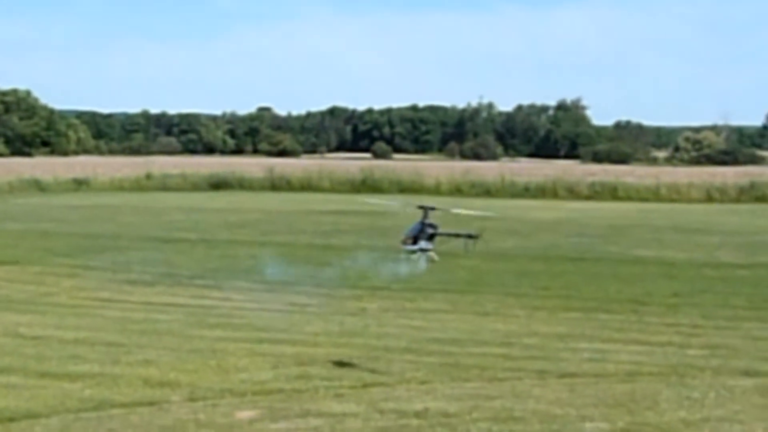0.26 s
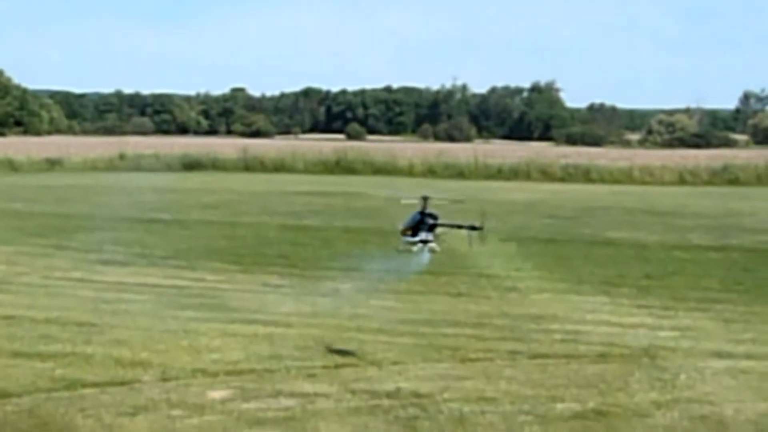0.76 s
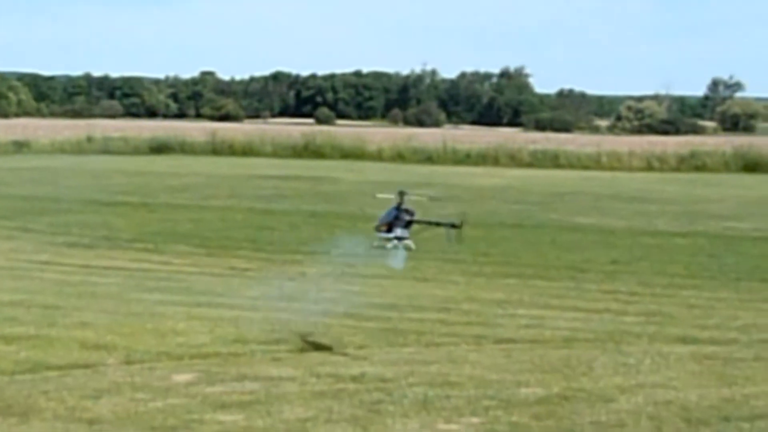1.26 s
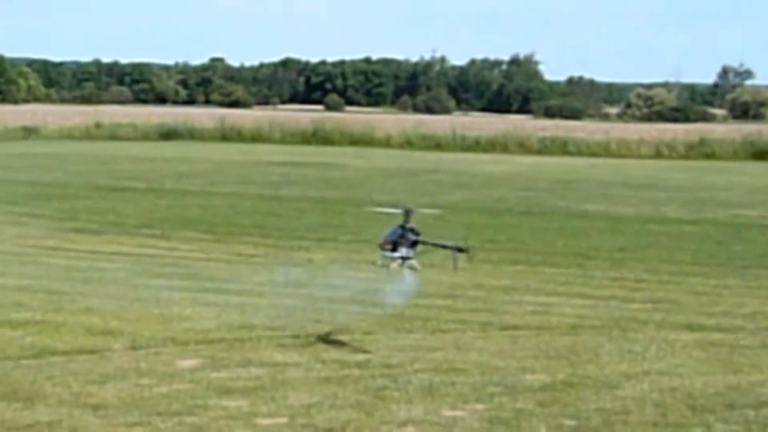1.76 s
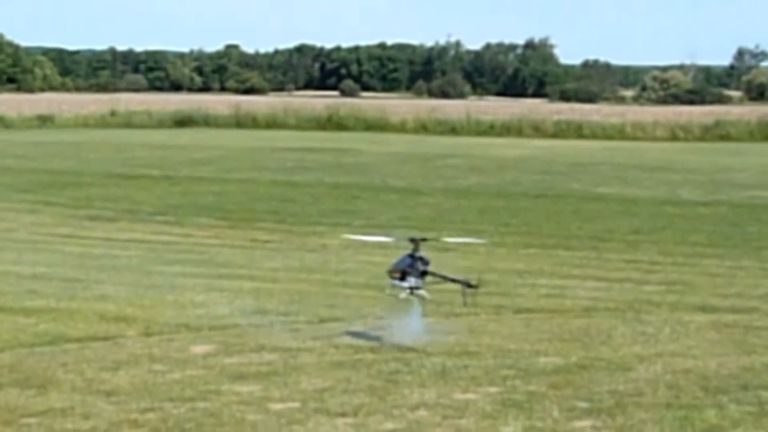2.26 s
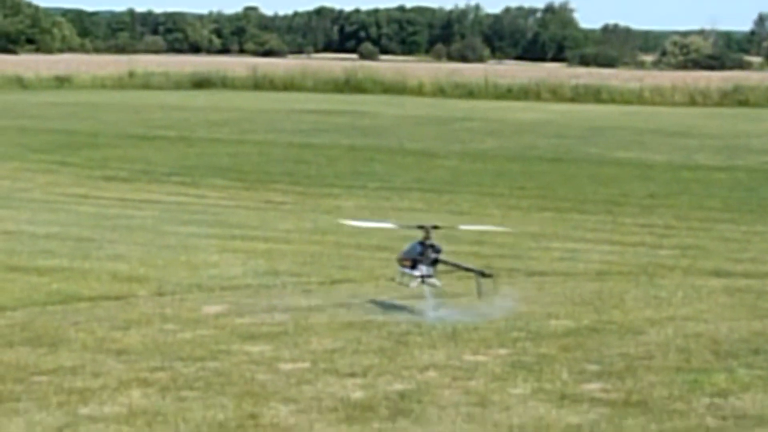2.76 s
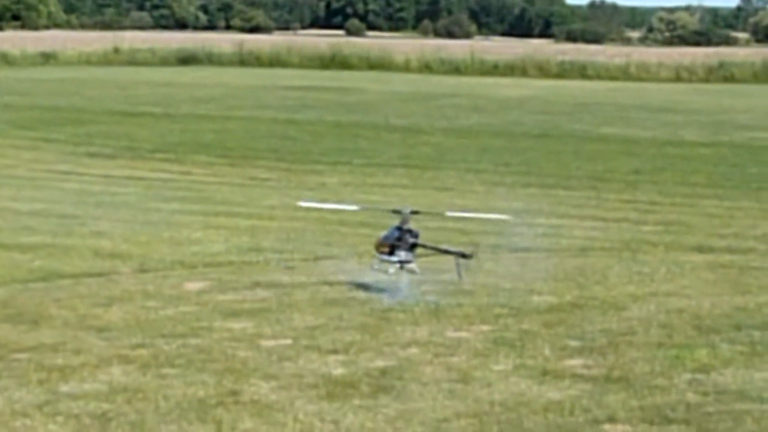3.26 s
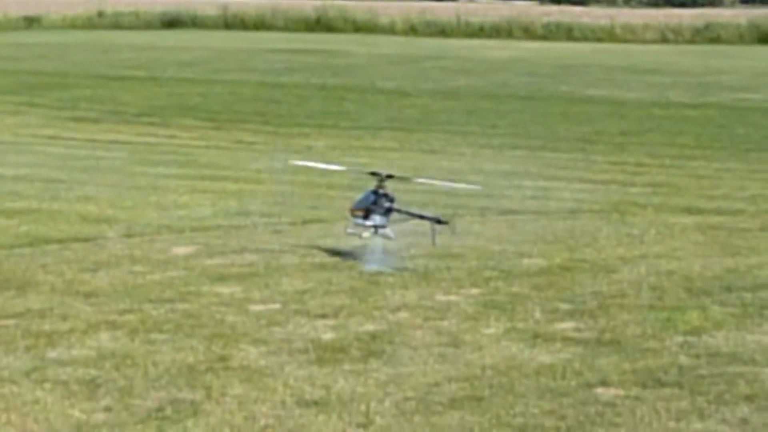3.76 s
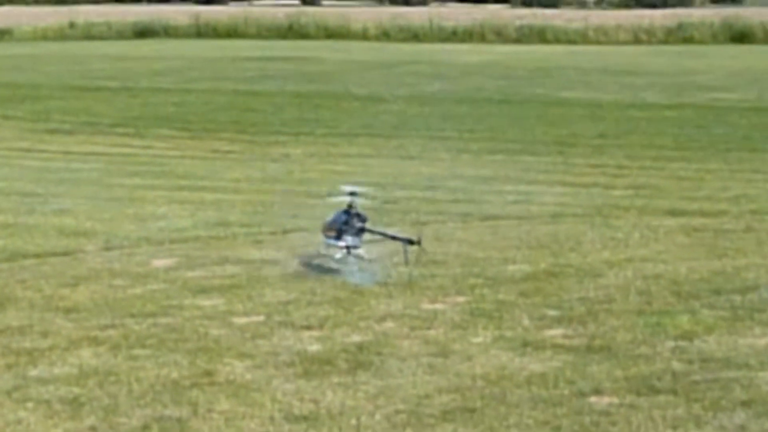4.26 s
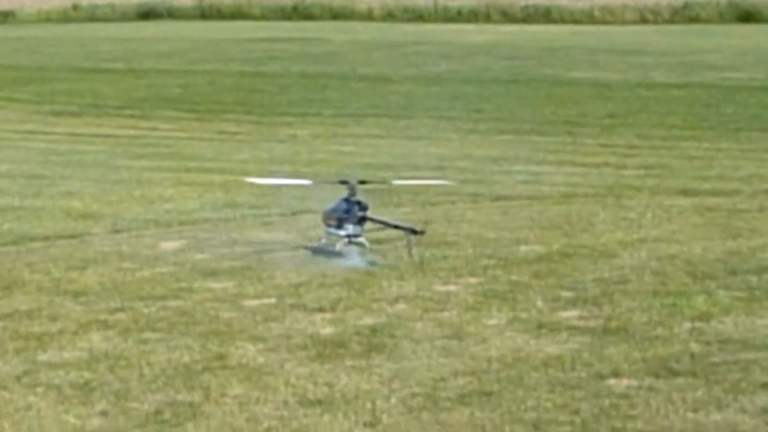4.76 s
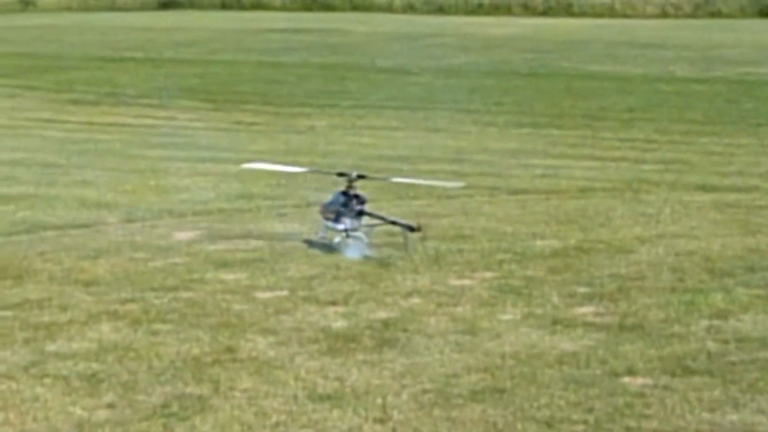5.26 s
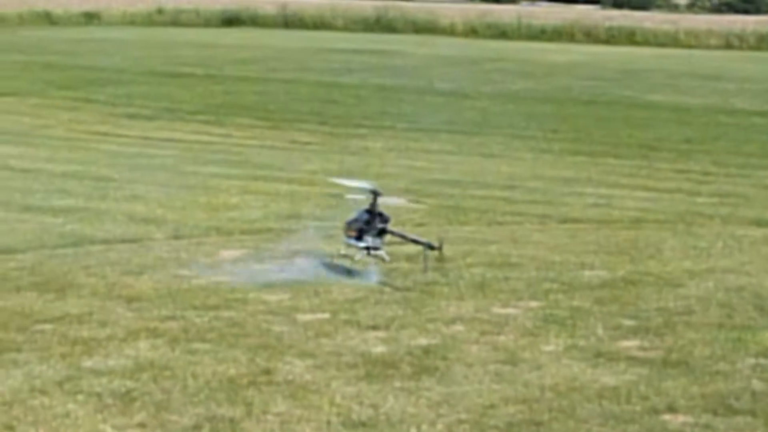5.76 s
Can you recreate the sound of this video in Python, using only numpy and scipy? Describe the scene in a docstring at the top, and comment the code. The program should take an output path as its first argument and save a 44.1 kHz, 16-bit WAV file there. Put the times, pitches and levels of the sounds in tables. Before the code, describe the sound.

Open field, stereo microphone in the wind, no echo. From 0 s a model helicopter hovers: a two-stroke engine whines as a buzzy stack of partials on roughly 235 Hz, edging up to 240 Hz by about 1.5 s and then holding. Uneven firings rasp and burble, blades hiss brightly, and a high gear tone near 4.8 kHz warbles about 28 times a second. Low, lumpy wind buffets from the start, with brief gaps and sharp soft-edged thumps on either side, clustered around 1.5-2.9 s. Between about 1.8 and 3.4 s the machine sinks; near 2.3 s its note turns nasal and honking. Afterwards the whine is fuller, the warble calmer, the gear tone coming and going. Gusts thin after 3 s, leave a clear gap around 4.6-5 s, return near 5.2-5.6 s and fade. The engine swells around 5.1 and 5.9 s, still running at 6 s. The very top is dull.

```python
"""An open field, with the microphone close by: a model helicopter hovers, sinks towards the grass, hovers again.
Its two-stroke engine whines as a stack of partials; strong and weak firings rasp and burble through the frame.
The gears sing a tone that warbles once per rotor turn, and the blades hiss as noise.
Gusts of lumpy noise buffet the two microphone ports and drop away, single eddies thump one port or the other,
and a faint, far rumble of air lies behind."""
import sys
import numpy as np
from scipy import signal
from scipy.fft import rfft, irfft, next_fast_len
from scipy.io import wavfile
from scipy.ndimage import map_coordinates

SR = 44100
rng = np.random.default_rng(int(sys.argv[2]) if len(sys.argv) > 2 else 0)


def wav_record(signal):
    """Record a signal, one row per channel, as 16-bit PCM in the file named by sys.argv[1]."""
    frames = np.transpose(np.atleast_2d(signal))
    bounded = np.clip(frames, -1, 1)
    # unit amplitude maps onto the largest positive 16-bit level
    quanta = np.round(bounded * 32767).astype(np.int16)
    wavfile.write(sys.argv[1], SR, quanta)


N = 264851  # samples


def amp(db):
    """Decibels to gain."""
    return 10 ** (np.asarray(db) / 20)


def unit(x):
    """Scaled to rms 1."""
    return x / np.sqrt(np.mean(x ** 2) + 1e-20)


def along(points, hz):
    """Values at hz, read between (Hz, value) points on a log frequency axis."""
    point_hz, values = np.transpose(points)
    return np.interp(np.log(hz + 1), np.log(point_hz + 1), values)


def curves(rows):
    """One value per sample for each column after the time."""
    seconds, *columns = np.transpose(rows)
    return [np.interp(np.arange(N) / SR, seconds, column) for column in columns]


def wobble(rate):
    """A smooth random curve through rate random knots a second."""
    coarse = np.arange(0, N, 16)  # every 16th sample is smooth enough
    knots = rng.standard_normal(int(N * rate / SR) + 4)
    return np.interp(np.arange(N), coarse, map_coordinates(knots, [coarse * rate / SR]))


def filtered(x, response):
    """x with its spectrum multiplied by response(Hz), without phase shift."""
    size = next_fast_len(N + SR // 2)
    return irfft(rfft(x, size) * response(np.fft.rfftfreq(size, 1 / SR)), size)[..., :N]


def ringing(x, level):
    """Both channels of x through a causal, minimum-phase filter whose gain in dB is level(Hz)."""
    size = 8192
    cepstrum = irfft(np.log(amp(level(np.fft.rfftfreq(size, 1 / SR)))))
    # folding the cepstrum forward puts all of the ringing after the blow
    cepstrum[1:size // 2] *= 2
    cepstrum[size // 2 + 1:] = 0
    impulse = irfft(np.exp(rfft(cepstrum)))
    return signal.fftconvolve(x, impulse[None], axes=1)[:, :N]


def stereo(mid, side):
    """Left and right from mid and side."""
    return np.array([mid + side, mid - side])


# Engine speed, which climbs and then holds nearly steady. Each row: time in seconds, firings a second.
ENGINE_SPEED = [(0, 234.8), (1.3, 239.3), (2.15, 239.8), (2.7, 239.2), (3.1, 240.4), (3.4, 240),
                (4.1, 240.8), (4.7, 240.9), (5.15, 240), (6, 240.8)]
# Loudness of the machine as it works, turns and drifts closer. Each row: time in seconds, level in dB.
LOUDNESS_CURVE = [(0.0, -42), (0.06, -43.5), (0.18, -38), (0.38, -42), (1.04, -40), (1.1, -41.5),
                  (1.5, -41), (2.01, -38.5), (2.46, -41.5), (3.23, -37.5), (3.5, -35), (3.63, -39.5),
                  (3.88, -34), (4.2, -37), (4.48, -34), (4.67, -35.5), (4.77, -32.5), (5.18, -29.5),
                  (5.25, -35.5), (5.6, -36), (5.9, -30.5), (6.01, -31.5)]
# Gear whine against the machine's loudness. Each row: time in seconds, level in dB.
GEAR_LEVEL = [(0, -1.5), (1.0, -3), (1.2, -4.5), (1.55, -6.5), (1.8, -1.5), (2.6, -3.5), (3.1, -13),
              (3.9, -9), (4.6, -16), (4.95, -4.5), (5.3, -17), (5.5, -3.5), (6, -23)]
GEAR_FLICKER_DB = 1.96
# each part's gain at the usual loudness (dB), and the dB it gains for each dB of loudness
USUAL_DB = -38
WHINE_DB, WHINE_GROWS = -49.5, 0.72
RASP_DB, RASP_GROWS = -40, 0.99  # ahead of the airframe
BURBLE_DB, BURBLE_GROWS = -56, 0.84  # ahead of the airframe
SHAKE_ALOFT, SHAKE_LOW = 1, .2  # rotor shake (0-1) at nearness 0 and 1
# the nasal honk early in the descent: its middle (s), its length (s), its height (dB)
HONK_S, HONK_LENGTH_S, HONK_DB = 2.3, 1, 7


def helicopter():
    """Engine, gears and blades, all tied to one crankshaft that turns once per firing."""
    speed, = curves(ENGINE_SPEED)
    loudness_db, = curves(LOUDNESS_CURVE)
    swell_db = loudness_db - USUAL_DB
    sink = descent()
    shake = np.clip(SHAKE_ALOFT + (SHAKE_LOW - SHAKE_ALOFT) * sink, 0, 1)
    honk_db = HONK_DB * 2 ** -(2 * (np.arange(N) / SR - HONK_S) / HONK_LENGTH_S) ** 2
    whine_db = WHINE_DB + WHINE_GROWS * swell_db
    rasp_db = RASP_DB + RASP_GROWS * swell_db
    burble_db = BURBLE_DB + BURBLE_GROWS * swell_db
    gear_db = loudness_db + curves(GEAR_LEVEL)[0] + GEAR_FLICKER_DB * wobble(8.1)

    gear_ratio, hunting, ripple = 8.57, .001, .0045  # crank per rotor turn, share of speed, crank turns
    turns = np.cumsum(speed * (1 + hunting * wobble(25))) / SR
    rotor = 2 * np.pi * turns / gear_ratio
    # the load of the blades speeds and slows the crank once per rotor turn
    turns = turns + ripple * (1 + np.sin(rotor))
    firings = np.diff(np.floor(turns), prepend=0)
    strength = firing_strength(turns, memory=.87)

    # the whine gives way a little while the honk stands out
    whine = amp(whine_db - 0.21 * honk_db) * exhaust(turns, sink, waver_db=0.43, blur=0.11)
    rush = brighten(rasp(turns, firings, strength, uneven_db=3.0))
    drive = amp(burble_db) * burble(firings, strength) + amp(rasp_db) * rush
    engine = honk(whine + airframe(drive, sink), honk_db, centre_hz=1630, width_hz=670)
    teeth = gears(turns, rotor, shake, sink, throb_db=4.2, blur=.55, upper_db=-1)
    return engine + amp(gear_db) * teeth * amp([[-.4], [.4]])  # the gears sit slightly right


# middle (s) and length (s) of the descent, nearness to the ground before and after (0-1)
DESCENT_S, DESCENT_LENGTH_S, NEAR_BEFORE, NEAR_AFTER = 2.57, 1.6, 0.23, 0.85


def descent():
    """Nearness to the ground: the machine hovers, sinks smoothly and hovers again."""
    progress = np.clip((np.arange(N) / SR - DESCENT_S) / DESCENT_LENGTH_S + .5, 0, 1)
    return np.clip(NEAR_BEFORE + (NEAR_AFTER - NEAR_BEFORE) * np.sin(np.pi / 2 * progress) ** 2, 0, 1)


def firing_strength(turns, memory):
    """Strength of each cycle from -1 (weak) to 1 (strong): a strong burn tends to be followed by a weak one."""
    cycle = turns.astype(int)
    draws = rng.standard_normal(cycle[-1] + 1)
    burns = signal.lfilter([1], [1, np.clip(memory, 0, .95)], draws)
    return np.tanh(unit(burns))[cycle]


# Partials of the exhaust note. Each row: multiple of the firing rate (sounded at the nearest whole one),
# relative level in dB aloft, relative level in dB near the ground.
EXHAUST_NOTE = [(1, -14, 13), (2, -8, -1), (3, 0.5, -5.5), (4, -3, -16.5), (5, 2.5, -10.5), (6, -13.5, -13),
                (7.1, -1, 1.5), (8, -18, -8.5), (9, -13, -2.5), (9.6, -6, -8), (11.1, -18, -7),
                (15, -4, -21), (16, -12, -2), (17, -7, -11.5), (19.9, -4, 3), (21, -33, -10),
                (21.8, -5, -2)]


def exhaust(turns, sink, waver_db, blur):
    """The clean whine, locked to the firings; moving air disturbs the high partials most."""
    note = np.zeros(N)
    for multiple, aloft_db, low_db in EXHAUST_NOTE:
        harmonic = round(multiple)
        level_db = aloft_db + (low_db - aloft_db) * sink + waver_db * np.sqrt(harmonic) * wobble(12)
        phase = 2 * np.pi * (harmonic * turns + rng.random()) + blur * multiple * wobble(40)
        note += amp(level_db) * np.sqrt(2) * np.cos(phase)
    return note


# Colour of the rasp ahead of the airframe. Each row: frequency in Hz, relative level in dB per Hz.
RASP_COLOUR = [(40, -5), (120, 4.5), (400, 3), (900, -7), (2000, -4), (3100, -1.5), (4500, 2.5), (6000, 3),
               (8000, -1), (9500, 0.5), (11000, -2.5), (12300, -0.5), (13000, -24)]
# Width of the rasp. Each row: frequency in Hz, gain of the side noise in dB.
RASP_SPREAD = [(100, -34), (500, -24), (1500, -75), (2600, -16.5), (4800, -11), (7000, -12), (9500, -12.5),
               (12500, -8)]
# Lean of the rasp. Each row: frequency in Hz, extra gain of left over right in dB.
RASP_LEAN = [(1000, -.3), (5000, -1.2), (8000, 0.5), (12000, 1.5)]


def rasp(turns, firings, strength, uneven_db):
    """Each firing cracks and puffs, over the hiss of the blades."""
    puff_decay, crack, hiss = .33, .3, 1.05  # part of a crank turn, then two gains
    size = amp(uneven_db * strength)
    cracks = unit(firings * size * (strength + rng.standard_normal(N)))
    puffs = unit(size * np.exp(-(turns % 1) / puff_decay))
    mid, side = puffs * rng.standard_normal((2, N)) + hiss * rng.standard_normal((2, N))
    # the cracks have little bass and sit in the middle; the rush is wider
    mid = mid + crack * filtered(cracks, lambda hz: hz / (hz + 900))
    side_noise = filtered(side, lambda hz: amp(along(RASP_SPREAD, hz)))
    pair = unit(stereo(mid, side_noise))

    def colour(hz):
        """Gain of left and right."""
        return amp(along(RASP_COLOUR, hz) + np.outer([.5, -.5], along(RASP_LEAN, hz)))

    return filtered(pair, colour)


# Treble against the rest of the rasp. Each row: time in seconds, gain in dB.
TREBLE_LEVEL = [(0, -3), (1.1, 2), (1.6, -3), (2.05, 1), (2.6, -2), (3.3, 2.5), (4.3, .5), (5.1, 0.5),
                (5.5, -5.5), (6, 0)]
TREBLE_FLICKER_DB, TREBLE_HZ = 1.8, 7500  # how much the treble flickers, and where it begins


def brighten(x):
    """The treble of the rasp comes and goes a little more than the rest."""
    treble = filtered(x, lambda hz: hz ** 4 / (hz ** 4 + TREBLE_HZ ** 4))
    treble_db = curves(TREBLE_LEVEL)[0] + TREBLE_FLICKER_DB * wobble(6)
    return x + (amp(treble_db) - 1) * treble


# Colour of the uneven exhaust pulses. Each row: frequency in Hz, relative level in dB per Hz.
BURBLE_COLOUR = [(170, -30), (350, -4), (600, 0), (900, -5), (1600, 0), (2300, 1), (3100, -5), (4500, -7),
                 (7000, -25)]


def burble(firings, strength):
    """Strong and weak exhaust pulses in turn sound fuzzy tones halfway between the partials."""
    return unit(filtered(firings * strength, lambda hz: amp(along(BURBLE_COLOUR, hz))))


# Muffler and frame resonances. Each row: centre in Hz, width in Hz, gain in dB aloft, gain in dB near the ground.
FRAME_RESONANCES = [(603, 260, -31, 8.5), (1237, 340, 12.5, 6.5), (1602, 90, 2.5, 10), (1749, 133, 6, 6),
                    (2296, 146, 6.5, 13), (2862, 184, -0.5, 9.5), (3427, 134, 2.5, 8.5), (3756, 260, -1, 6),
                    (4290, 280, 1.5, 6), (4667, 183, 12.5, 4), (5024, 320, 3, 13.5), (5510, 640, 6.5, -8),
                    (5494, 300, -3, 14.5), (6160, 200, -2.5, 4.5), (7090, 200, 8.5, 1.5),
                    (8610, 330, 8, 4.5), (9530, 485, 9, 8.5), (10220, 300, 6.5, 7.5), (10900, 170, 8, 1.5),
                    (12830, 300, -7, 17.5)]


def airframe(x, sink):
    """x through the resonances, whose balance shifts as the machine sinks."""
    def body(hz, low):
        """Gain in dB aloft (low = 0) or near the ground (low = 1)."""
        return sum((aloft_db + (low_db - aloft_db) * low) * 2 ** -(2 * (hz - centre) / width) ** 2
                   for centre, width, aloft_db, low_db in FRAME_RESONANCES)

    aloft = ringing(x, lambda hz: body(hz, 0))
    near_ground = ringing(x, lambda hz: body(hz, 1.0))
    return (1 - sink) * aloft + sink * near_ground


def honk(x, boost_db, centre_hz, width_hz):
    """On the way down the note turns nasal: one band of it stands out."""
    band = filtered(x, lambda hz: 2 ** -(2 * (hz - centre_hz) / width_hz) ** 2)
    return x + (amp(boost_db) - 1) * band


def gears(turns, rotor, shake, sink, throb_db, blur, upper_db):
    """The teeth mesh twenty times per engine turn; a shaking rotor makes their whine warble."""
    warble = 1.45 * shake * np.sin(rotor)  # radians
    phase = 2 * np.pi * 20 * turns + warble + blur * np.sqrt(shake) * wobble(130)
    # near the ground a second strand stands out, one firing rate higher
    upper = amp(upper_db + 2.5 * wobble(8)) * sink * np.sin(phase + 2 * np.pi * turns)
    throb = amp(throb_db * shake * np.sin(rotor) + wobble(90))
    return unit(throb * (np.sin(phase) + upper))


# Gusts on the microphone ports. Each row: start of the full blow in seconds, its length in seconds,
# buffet level in dB, flutter level in dB, deep rumble level in dB.
GUST_ROWS = [(0, .77, -29, -27, -42), (0.84, 0.14, -35, -27, -44), (1.013, 0.51, -30, -25.5, -42),
             (1.551, 0.23, -30, -27.5, -40), (1.844, 0.093, -26.5, -27, -38), (2.026, .17, -30, -33, -37.5),
             (2.229, 0.046, -26, -27, -45), (2.339, 0.21, -29.5, -26.5, -45), (2.59, .1, -29.5, -38, -42),
             (2.751, 0.093, -28.5, -32, -34.5), (3.229, 0.014, -38, -34, -41), (3.363, 0.13, -27, -39, -40),
             (3.501, 0.16, -29, -29.5, -39), (3.714, 0.32, -29.5, -37, -40), (4.077, 0.22, -29, -33, -38),
             (4.368, .22, -33.5, -34, -42), (4.993, 0.23, -33.5, -48, -39),
             (5.178, 0.13, -28, -35.5, -31.5), (5.336, .16, -31.5, -26, -37), (5.536, 0.036, -36, -44, -44),
             (5.863, 0.18, -45, -62, -48)]
# Colours of the wind noise. Each row of the three: frequency in Hz, relative level in dB per Hz.
RUMBLE_COLOUR = [(20, -16), (45, -5.5), (80, 0), (115, -5), (180, -34), (400, -62)]
BUFFET_COLOUR = [(20, -26), (40, -12.5), (70, -7.5), (110, 1.5), (180, 1), (280, -8), (450, -17.5),
                 (900, -73), (2000, -77)]
FLUTTER_COLOUR = [(60, -29), (170, -2.5), (280, 1.5), (420, -3), (600, -11.5), (850, -19.5), (1300, -30),
                  (2500, -45), (6000, -80)]
GUST_ATTACK_S, GUST_RELEASE_S = .028, 0.039  # time constants of a gust's buffeting
FLUTTER_QUICKER = 1.42  # the small eddies come and go this much faster
EDDY_DB, EDDY_RATE = 1.4, 16  # random swings of the wind (dB, knots a second)


def wind():
    """Each gust rises, holds and drops away: large eddies rumble and buffet the ports, small ones flutter on top."""
    t = np.arange(N) / SR
    rumble, buffet, flutter = np.zeros((3, N))
    for start, length, buffet_db, flutter_db, rumble_db in GUST_ROWS:
        rise = np.maximum(start - t, 0) / GUST_ATTACK_S
        fall = np.maximum(t - start - length, 0) / GUST_RELEASE_S
        shape = np.exp(-np.minimum(rise + fall, 20))
        # where gusts overlap, the stronger one is heard
        rumble = np.maximum(rumble, amp(rumble_db) * shape)
        buffet = np.maximum(buffet, amp(buffet_db) * shape)
        flutter = np.maximum(flutter, amp(flutter_db) * shape ** FLUTTER_QUICKER)
    air = rumble * turbulence(RUMBLE_COLOUR, lump_db=-1, lump_rate=30)
    air += buffet * turbulence(BUFFET_COLOUR, lump_db=1.5, lump_rate=60)
    air += flutter * turbulence(FLUTTER_COLOUR, lump_db=3.5, lump_rate=170)
    return amp(EDDY_DB * wobble(EDDY_RATE)) * air


# Wind at the two ports. Each row: frequency in Hz, side over mid in dB.
PORT_DIFFERENCE = [(30, -3), (110, -2.5), (250, 0), (500, 5), (800, 8.5), (1500, 5), (3000, 1)]


def turbulence(spectrum, lump_db, lump_rate):
    """Lumpy pressure noise, partly opposed at the two ports."""
    lumps = amp(lump_db * wobble(lump_rate))
    mid, side = filtered(lumps * rng.standard_normal((2, N)), lambda hz: amp(along(spectrum, hz)))
    opposed = filtered(side, lambda hz: amp(along(PORT_DIFFERENCE, hz)))
    return stereo(mid, opposed) / mid.std()


# Eddies that thump a port. Each row: time in seconds, level in dB before the envelope,
# rate in Hz that sets the pitch and the decay, port (1 left, -1 right).
PORT_THUMPS = [(.2354, -5, 800, 1), (.553, -11, 480, -1), (.66, -14, 560, -1), (1.049, -9, 450, 1),
               (1.553, -9, 280, -1), (1.670, -6, 370, -1), (1.745, -6.5, 420, 1), (1.888, -12, 330, -1),
               (2.231, -12, 280, 1), (2.347, -11, 310, 1), (2.42, -13, 350, -1), (2.773, -13, 170, 1),
               (2.888, -21, 300, -1), (3.518, -13, 500, 1), (3.612, -11, 440, 1), (3.806, -15, 200, -1),
               (4.096, -12, 190, 1), (4.186, -15, 320, 1), (4.278, -13, 220, -1), (5.382, -11, 240, -1),
               (5.443, -10, 280, 1), (5.512, -10, 220, -1)]


def thumps():
    """An eddy hits one port with a steep front and a swing that slows as it dies; the other swings against it."""
    out, t = np.zeros((2, N)), np.arange(SR // 40) / SR
    rise = .0004  # s
    for s, db, hz, port in PORT_THUMPS:
        cycles = 1.8 * np.log1p(hz * t / 1.1)  # fast at first, then ever slower
        envelope = np.exp(-(hz * t / 1.8) ** 2) * (1 - np.exp(-t / rise))
        push = amp(db) * np.sin(2 * np.pi * cycles) * envelope
        out[:, round((s - rise) * SR):][:, :len(t)] += stereo(.45 * push, .55 * np.sign(port) * push)
    return out


def field():
    """A faint, far rumble of air over the open field, much alike at both ports."""
    colour = [(20, -13), (70, 12.5), (150, -14), (400, -9), (2000, -27)]  # Hz, relative dB per Hz
    mid, side = filtered(rng.standard_normal((2, N)), lambda hz: amp(along(colour, hz)))
    return amp(-55.0) * unit(stereo(mid, amp(-10) * side))


def scene():
    """The helicopter out on the field and the wind at the microphone."""
    return helicopter() + wind() + thumps() + field()


def record(dry):
    """The sound is dull at the very top: nothing is heard above 13150 Hz."""
    return filtered(dry, lambda hz: hz < 13150)


dry = scene()
out = record(dry)
wav_record(out)
```